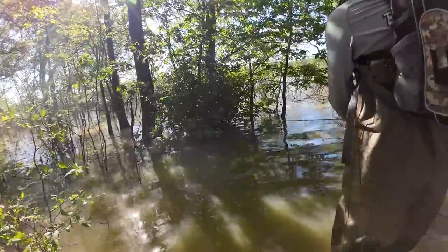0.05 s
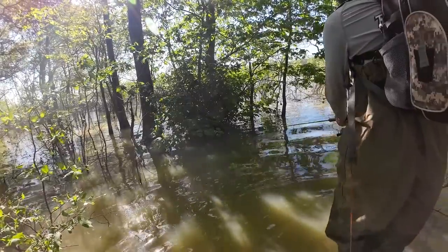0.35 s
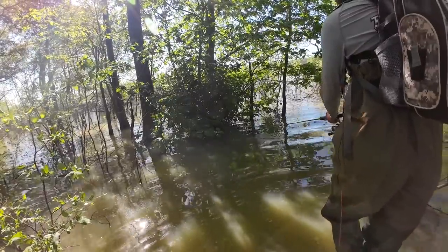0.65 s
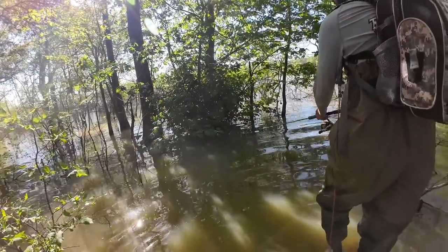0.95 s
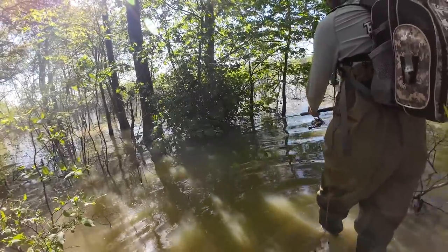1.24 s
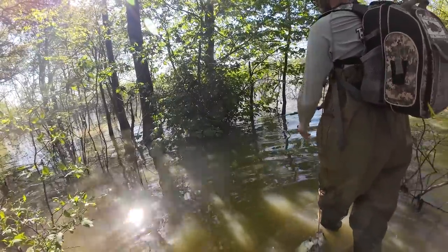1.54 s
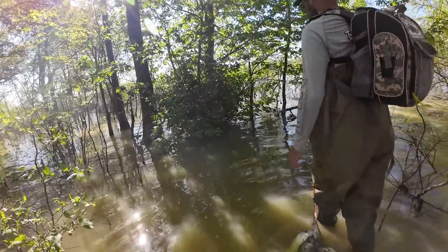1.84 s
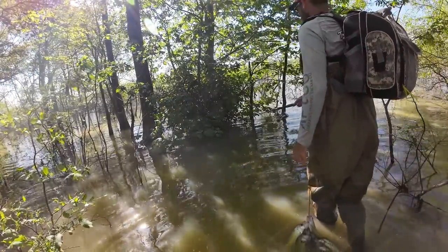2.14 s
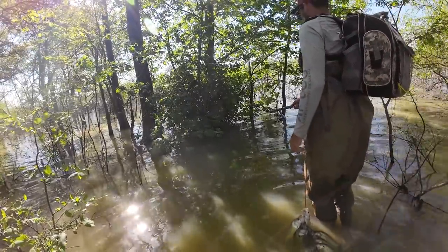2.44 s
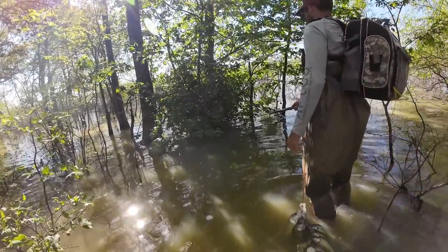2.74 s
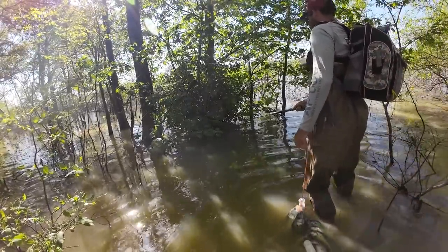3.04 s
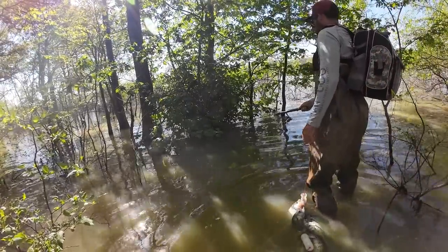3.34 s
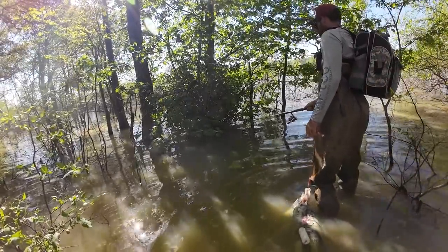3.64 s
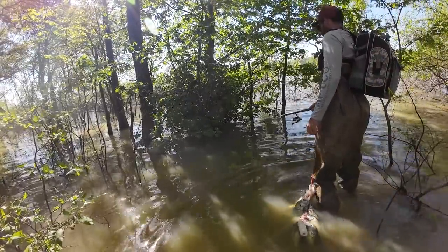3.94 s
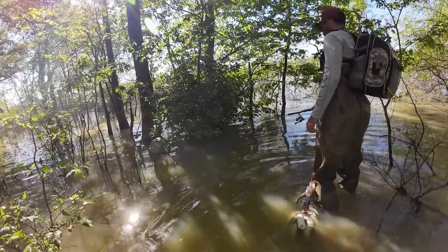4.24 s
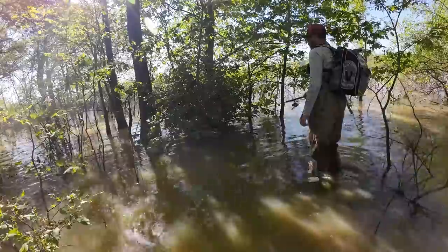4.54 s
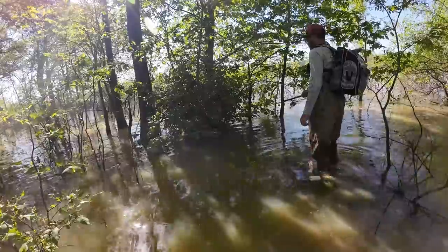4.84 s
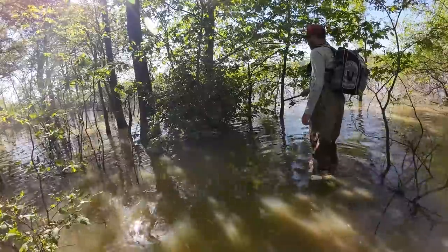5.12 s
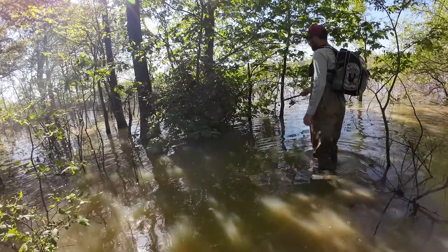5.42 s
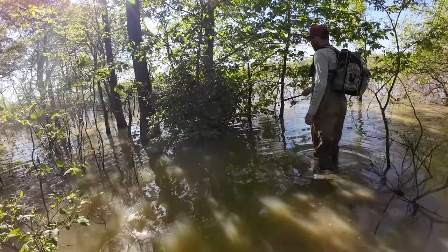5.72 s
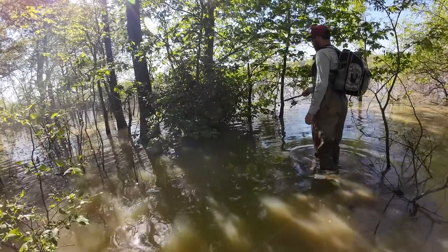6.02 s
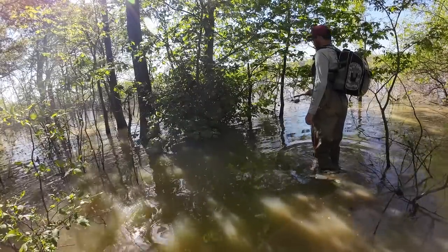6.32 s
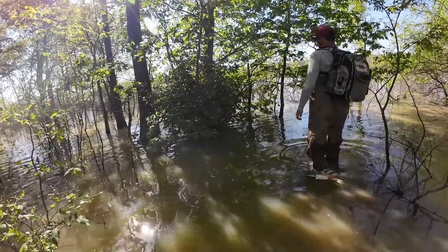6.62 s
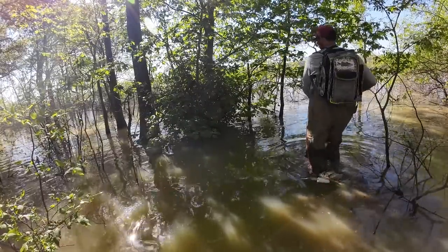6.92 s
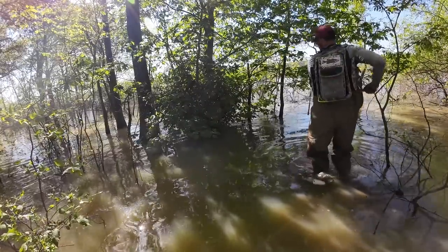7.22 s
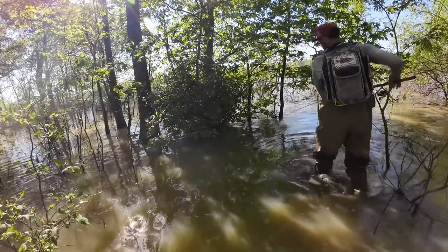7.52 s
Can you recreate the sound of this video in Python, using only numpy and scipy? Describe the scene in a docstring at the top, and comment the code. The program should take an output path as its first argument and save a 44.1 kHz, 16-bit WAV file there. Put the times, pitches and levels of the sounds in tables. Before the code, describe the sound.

Water sloshes, gurgles and drips around a person's legs wading slowly, with wet cloth swishing over a low rumble of wind.

```python
"""A flooded wood, where a man in waders steps slowly through knee-deep water a few metres away.
The trees hiss faintly, a few far birds call, and a far motor and a deep hum drone under gusts of air.
His wet cloth rubs and swishes with each stride. The water he pushes aside gurgles as trapped
bubbles ring, then slaps and drips as it falls back."""
import sys
import numpy as np
from scipy import signal
from scipy.fft import rfft, irfft, next_fast_len
from scipy.io import wavfile
from scipy.ndimage import uniform_filter1d, map_coordinates

SR = 44100
rng = np.random.default_rng(int(sys.argv[2]) if len(sys.argv) > 2 else 0)


def to_wav(sig):
    """Store sig (one row per channel, or 1-D mono) as 16-bit WAV at the path in sys.argv[1].

    Samples outside -1..1 are clipped; the rate is SR.
    """
    pcm = np.clip(np.atleast_2d(sig), -1, 1) * 32767
    pcm = np.round(pcm).astype(np.int16)
    wavfile.write(sys.argv[1], SR, pcm.T)  # frames by channels


N = 338114
TIME = np.arange(N) / SR


def amp(db):
    """Turns decibels into a number to multiply by."""
    return 10 ** (np.asarray(db) / 20)


def unit(x):
    """Scales a signal to an average strength (rms) of 1."""
    return x / np.sqrt(np.mean(x ** 2) + 1e-20)


def read(points, hz):
    """Looks up a pitch in a table, blending between rows on a musical (log) scale."""
    pitches, values = np.transpose(points)
    return np.interp(np.log(hz + 1), np.log(pitches + 1), values)


def colour(x, points):
    """Turns pitches up or down by a table of (pitch [Hz], gain [dB])."""
    size = next_fast_len(N + 4096)
    gain = amp(read(points, np.fft.rfftfreq(size, 1 / SR)))
    return irfft(rfft(x, size) * gain, size)[..., :N]


def wander(per_s):
    """A random drift of strength 1 that picks a new target per_s times a second."""
    targets = rng.standard_normal(8192)
    return unit(np.interp(TIME * per_s, np.arange(len(targets)), targets))


def add(mix, start, sound):
    """Mixes a sound in at a start time in seconds."""
    part = mix[max(round(start * SR), 0):][:len(sound)]
    part += sound[:len(part)]


def patches(x, depth_db, size=256):
    """Lets loudness drift in small patches of time and pitch."""
    spectrum = signal.stft(x, nperseg=size)[2]
    drift = uniform_filter1d(rng.standard_normal(spectrum.shape), size=6, axis=0)
    drift = unit(uniform_filter1d(drift, size=5, axis=1))
    return signal.istft(spectrum * amp(depth_db * drift), nperseg=size)[1][:N]


def surge(start, swell, hold, fade, swell_db=12, fade_db=24.5, onset_share=0.08):
    """One push: it sets in quickly, climbs by swell_db, holds, then drops fade_db per fade time."""
    t = TIME - start
    db = swell_db * np.minimum(t / swell - 1, 0) - fade_db * np.maximum(t - swell - hold, 0) / fade
    return np.clip(t / (onset_share * swell), 0, 1) * amp(db)


# The tone of the woods' hush: (pitch [Hz], relative level [dB])
WOODS_TONE = [(100, 5), (250, 0.5), (340, -1.5), (600, -4), (900, -9), (1300, -16.5), (1900, -24.5),
              (2700, -23.5), (4300, -30), (5300, -24.5), (8000, -34), (11000, -32), (16000, -32)]


def woods(level_db=-53.5, sway_db=0.6):
    """A far, even hush; its treble comes from all sides."""
    around = colour(rng.standard_normal((2, N)), [(300, -18), (1200, -8.5), (3000, -2), (6000, -1.5)])
    ahead = colour(rng.standard_normal(N), [(1200, -0.5), (3000, -4), (6000, -8)])
    breeze_db = np.interp(TIME, [0, 3.8, 5.8, 7.67], [0.83, -1.4, -2.5, 1])
    return amp(level_db + breeze_db + sway_db * wander(9.7)) * unit(colour(around + ahead, WOODS_TONE))


# Far bird calls: (time [s], level [dB], length [s], first pitch [Hz], last pitch [Hz], width [Hz])
BIRD_CALLS = [(4.227, -76.5, 0.17, 6760, 7400, 1910), (5.502, -69.5, 0.21, 795, 640, 70),
              (5.528, -75, 0.21, 1190, 1006, 119.4), (5.588, -75, 0.22, 1300, 1276, 110),
              (5.546, -72, 0.04, 3720, 3570, 600), (5.558, -78, 0.11, 3500, 3720, 400)]


def birds():
    """Trees blur each faint call into a narrow band of noise that swells and dies away."""
    out = np.zeros(N)
    for start, db, length, first, last, width in BIRD_CALLS:
        hz = np.geomspace(first, last, int(length * SR))
        progress = np.linspace(0, 1, len(hz))
        lowpass = signal.butter(4, width / 2, fs=SR, output="sos")
        blur = signal.sosfilt(lowpass, rng.standard_normal((2, 16384)))[:, -len(hz):]
        note = ((blur[0] + 1j * blur[1]) * np.exp(2j * np.pi * np.cumsum(hz) / SR)).real
        add(out, start, amp(db) * unit(note * progress * (1 - progress) ** 2))
    return out


def hum(hz=64.4, level_db=-47.5, waver_db=3.5, blur_turns=0.22):
    """A deep hum that keeps its pitch and wavers a little with the air."""
    gain = amp(level_db + waver_db * np.tanh(wander(9.3)))
    turns = hz * TIME + rng.random() + blur_turns * wander(14)
    return np.sqrt(2) * gain * np.sin(2 * np.pi * turns)


# How fast the motor's shaft spins: (time [s], speed [turns per s])
SHAFT_SPEED = [(0.15, 33.45), (1.45, 32.74), (1.88, 33.65), (2.62, 32.84), (4.5, 32.55), (5.47, 34.3),
               (6.05, 34.96), (6.95, 33.82), (7.67, 33.35)]
# The motor's notes: (pitch [times the shaft speed], first level [dB], last level [dB])
MOTOR_NOTES = [(3, -52.5, -52), (4, -58, -51), (4.5, -59, -60.5), (5, -61, -52.5), (6, -55, -50.5),
               (7, -75.5, -65), (9, -58.5, -79)]


def motor(waver_db=2, jitter_hz=0.1676, blur_turns=0.06, throb_hz=4.2, exhaust_db=-48):
    """One spinning shaft makes several notes, each wavering on its long way through the trees."""
    shaft_turns = np.cumsum(np.interp(TIME, *np.transpose(SHAFT_SPEED)) + jitter_hz * wander(8)) / SR
    throb = np.abs(1 + 0.69 * np.exp(2j * np.pi * throb_hz * (TIME - 6.28)))
    exhaust = amp(exhaust_db) * throb * surge(start=4.82, swell=0.74, hold=1, fade=2.8)
    out = np.zeros(N)
    for multiple, first_db, last_db in MOTOR_NOTES:
        gain = amp(np.linspace(first_db, last_db, N))
        if multiple == 4:  # the exhaust note swells and throbs as the motor speeds up
            gain = np.hypot(gain, exhaust)
        gain = gain * amp(waver_db * wander(12))
        turns = multiple * shaft_turns + rng.random() + blur_turns * wander(22)
        out += np.sqrt(2) * gain * np.sin(2 * np.pi * turns)
    return out


# The tone of the air's rumble: (pitch [Hz], relative level [dB])
RUMBLE_TONE = [(10, 1.5), (30, 10.5), (55, 5), (80, 6.5), (110, -8), (180, -11.5), (260, -14), (400, -66),
               (1500, -87)]
# Gusts of air: (time [s], swell [s], hold [s], fade [s], rumble level [dB], buffeting level [dB])
AIR_GUSTS = [(-.3, 0.18, 0.13, 2.1, -36.5, -65), (0.363, 0.047, 0.086, 0.49, -39, -51),
             (0.666, 0.039, 0.17, 1.26, -58, -36), (1.396, 0.075, 0.29, 2.4, -49.5, -41.5),
             (2.424, 0.038, 0.091, 0.72, -49.5, -36.5), (2.743, 0.097, 1, 1.3, -48.5, -39),
             (3.318, 0.026, 0.02, 0.12, -39, -41), (3.754, 0.049, 0.042, 0.64, -44, -46),
             (7.1, .28, .2, .6, -61, -61)]


def wind(calm_rumble_db=-48.5, calm_buffet_db=-52, lump_db=5.5, lumps_per_s=11):
    """Moving air rumbles; its deepest part buffets the left and right sides separately, in lumps."""
    buffet_tone = [(10, -1.5), (30, 0), (65, -6), (110, -19.5), (250, -41), (600, -61), (2500, -94)]
    rumble = unit(colour(rng.standard_normal(N), RUMBLE_TONE))
    buffet = unit(colour(rng.standard_normal((2, N)), buffet_tone))
    blowing = np.linalg.norm([amp(db) * surge(*shape) for *shape, db, _ in AIR_GUSTS], axis=0)
    shaking = np.linalg.norm([amp(db) * surge(*shape) for *shape, _, db in AIR_GUSTS], axis=0)
    lumps = amp(lump_db * np.tanh(wander(lumps_per_s)))
    shaking = shaking * lumps * amp([[1.5], [-1.5]])  # stronger on the left
    rumble_gain = np.hypot(amp(calm_rumble_db), blowing)
    buffet_gain = np.hypot(amp(calm_buffet_db), shaking)
    return rumble_gain * rumble + buffet_gain * buffet


# The tone of rubbing wet cloth: (pitch [Hz], relative level [dB])
CLOTH_TONE = [(150, 3.5), (300, 7), (600, 2.5), (950, -5.5), (1400, 2), (2000, -4), (3200, 2), (4300, 0.5),
              (5500, 1), (7000, -1.5), (9000, -7.5), (10500, -4), (16000, -19)]
# Each push of a leg: (time [s], swell [s], hold [s], fade [s], cloth level [dB], water level [dB])
LEG_PUSHES = [(-.3, 0.14, 0.13, 0.34, -58, -64.5), (0.07, 0.03, 0.31, 0.76, -57.5, -58.5),
              (0.203, 0.27, 0.088, 0.59, -53.5, -54.5), (0.836, 0.042, 0.45, 0.16, -72, -63.5),
              (1.358, 0.029, 0.031, 0.15, -59.5, -58.5), (1.513, 0.026, 0.45, 0.22, -66.5, -72),
              (1.987, 0.049, 0.039, 0.4, -51, -53), (2.1, 0.047, 0.24, 0.2, -46, -54.5),
              (2.572, 0.053, 0.66, 0.28, -64.5, -58.5), (4.402, 0.0022, 0.04, 0.49, -52, -58.5),
              (4.853, 0.031, 0.046, 0.59, -69.5, -63.5), (6.31, 0.073, 0.025, 0.72, -54, -85),
              (6.496, 0.039, 0.47, 0.25, -63, -53.5), (7.081, 0.32, 0.025, 0.34, -46.5, -42),
              (7.52, 0.034, 0.07, 0.11, -44, -41)]


def swish(snaps_per_s=3000, spread_db=3, flutter_db=0.5, echo_gain=0.2, echo_ms=(1.188, 0.52)):
    """Wet cloth rubs and sheds spray: a hiss full of tiny snaps, plus its echo off the water."""
    snaps = (rng.random(N) < snaps_per_s / SR) * rng.choice([-1, 1], N)
    snaps = snaps * amp(spread_db * np.minimum(rng.exponential(1, N), 5))
    rub = patches(unit(snaps) + 1.46 * rng.standard_normal(N), depth_db=2.5)
    effort, delay_ms = np.zeros(N), np.zeros(N)
    for start, swell, hold, fade, db, _ in LEG_PUSHES:
        effort = np.hypot(effort, amp(db) * surge(start, swell, hold, fade))
        # the echo comes sooner as the leg swings down, so the tone sweeps upward
        sweep_ms = np.interp(TIME, [start, start + swell + hold + fade], echo_ms)
        delay_ms = np.where(TIME < start, delay_ms, sweep_ms)
    echo = map_coordinates(rub, [np.arange(N) - delay_ms * SR / 1000], order=3)
    return unit(colour(rub + echo_gain * echo, CLOTH_TONE)) * effort * amp(flutter_db * wander(70))


def stirring(lag_s=0.006, settle_s=0.092):
    """How hard the water moves: it follows each push of a leg a little late and calms more slowly."""
    pushes = [amp(db) * surge(start + lag_s, swell, hold, fade + settle_s)
              for start, swell, hold, fade, _, db in LEG_PUSHES]
    return np.linalg.norm(pushes, axis=0)


def bubble(hz, ring_s, glide, attack_s):
    """A pocket of air rings and drops 60 dB in ring_s, while its pitch slides by the share glide."""
    t = np.arange(int(1.2 * ring_s * SR) + 8) / SR
    note = np.sin(2 * np.pi * hz * (t + glide * t ** 2 / ring_s / 2))
    return note * np.exp(-np.log(1000) * t / ring_s) * (1 - np.exp(-t / attack_s))


# How loud bubbles are, from big and low to small and high: (pitch [Hz], relative level [dB])
BUBBLE_LEVELS = [(350, -28), (600, -1), (1250, 10), (2000, -4.5), (3300, -1), (5500, 3), (11000, 2)]


def swarm(pitches, per_s, spread_db, cycles):
    """Bubbles born at random, most of them weak; the small, high ones tend to die first."""
    out = np.zeros(N)
    for hz in pitches:
        births = rng.random(N) < per_s / len(pitches) / SR
        strengths = amp(spread_db * np.minimum(rng.exponential(1, N), 3.5))
        ring_s = cycles / np.sqrt(hz * 900) * rng.uniform(0.61, 1.9)
        ring = bubble(hz, ring_s, glide=rng.uniform(-0.59, 0.64), attack_s=2 / hz)
        out += amp(read(BUBBLE_LEVELS, hz)) * signal.oaconvolve(births * strengths, ring)[:N]
    return unit(out)


def drips(ring_db=-65, tick_db=-67, patter_db=-66, stirred_db=-59):
    """Drops fall back into stirred water: larger ones ring, tiny ones tick and clumps patter."""
    stir = stirring()
    rings = swarm(np.geomspace(600, 4000, 24), per_s=70, spread_db=2, cycles=13.6)
    ticks = swarm(np.geomspace(2800, 8500, 24), per_s=260, spread_db=3, cycles=8)
    patter = swarm(np.geomspace(1400, 4200, 20), per_s=700, spread_db=2.5, cycles=9)
    clumps = unit(patches(patter, depth_db=4, size=512))
    dripping = stir / np.hypot(stir, amp(stirred_db))
    return dripping * (amp(ring_db) * rings + amp(tick_db) * ticks + amp(patter_db) * clumps)


def slosh(bubbles_db=-8.5, churn_db=-4, crackle_db=-14, lap_db=3, throw_db=-64, merge_db=-49):
    """Stirred water: bubbles merge into a churn under a hard push, and droplets crackle on top."""
    churn_tone = [(120, -7), (350, 1.5), (600, 3.5), (1000, -0.5), (1400, -1.5), (2000, -3),
                  (3000, -4), (6000, -34), (12000, -42)]
    stir = stirring() * amp(lap_db * wander(14))
    bubbles = swarm(np.geomspace(420, 4500, 40), per_s=420, spread_db=3, cycles=26.7)
    crackle = swarm(np.geomspace(4200, 12000, 24), per_s=500, spread_db=6, cycles=8)
    churn = unit(colour(patches(rng.standard_normal(N), depth_db=3), churn_tone))
    thrown = stir ** 2 / (stir ** 2 + amp(throw_db) ** 2)  # calm water throws no droplets
    merged = stir ** 2 / (stir ** 2 + amp(merge_db) ** 2)
    bubble_gain = amp(bubbles_db) * np.sqrt(1 - merged)
    churn_gain = np.hypot(amp(churn_db), amp(bubbles_db) * np.sqrt(merged))
    return stir * (bubble_gain * bubbles + churn_gain * churn + amp(crackle_db) * thrown * crackle)


# Air pockets closing: (time [s], level [dB], length [s], first pitch [Hz], last pitch [Hz])
AIR_POCKETS = [(0.801, -56, 0.025, 683, 1400), (0.904, -50, 0.02, 740, 875), (1.323, -54, 0.019, 625, 730),
               (1.325, -51.5, 0.011, 1390, 1300), (1.456, -58.5, .026, 1550, 1730),
               (3.22, -53, .043, 700, 3210), (3.233, -45, 0.036, 370, 630), (6.527, -50, 0.035, 605, 640),
               (7.061, -53, 0.036, 650, 1380)]


def gulps(roughness=0.35, jitter=0.015):
    """A hollow behind the leg fills, so its ragged note glides, mostly upward."""
    out = np.zeros(N)
    for start, db, length, first, last in AIR_POCKETS:
        count = int(length * SR)
        hz = np.geomspace(first, last, count) * (1 + jitter * wander(493)[:count])
        ragged = 1 + roughness * wander(482)[:count]
        note = np.sin(2 * np.pi * np.cumsum(hz) / SR)
        add(out, start, amp(db) * ragged * note * signal.windows.tukey(count, 0.5))
    return out


def boot_thump(start=0.632, db=-28, hz=115):
    """A boot sets down in the mud with a dull knock."""
    out = np.zeros(N)
    add(out, start, amp(db) * bubble(hz, ring_s=0.11, glide=1, attack_s=0.0026))
    return out


# The loudest drops and bubbles: (time [s], relative level [dB], pitch [Hz], glide [share of pitch])
BIG_DROPS = [(.034, -35.5, 684, -0.1), (.116, -37.5, 506, -0.047), (.545, -36, 7600, -0.23),
             (.586, -30.5, 8900, 0.1), (.588, -29, 3000, -0.37), (.611, -29.5, 2260, -0.3),
             (.904, -43.5, 2540, -.4), (1.019, -39, 3360, -0.03), (1.111, -37.5, 3000, -0.31),
             (1.185, -47, 2500, 0.34), (1.232, -43.5, 10500, 0), (1.308, -46, 705, -0.054),
             (1.371, -46.5, 1290, 0), (1.418, -39, 1220, -0.014), (1.446, -44.5, 3600, -.2),
             (1.526, -47, 1190, 0.2), (1.595, -40, 700, .2), (1.686, -33.5, 506, -0.11),
             (2.271, -36.5, 1050, -0.11), (2.311, -41.5, 690, -0.1), (2.404, -36, 1620, -.3),
             (2.5915, -32.5, 3290, -0.18), (2.608, -46, 5250, -0.06), (2.676, -46, 5650, -0.055),
             (2.788, -43, 1780, -0.23), (2.868, -44.5, 2540, -0.33), (2.904, -48, 10250, -0.13),
             (2.924, -43, 2900, -.3), (2.938, -37, 2000, 0.24), (2.993, -43.5, 3170, 0),
             (3.009, -40, 3010, 0.051), (3.026, -41, 1850, 0.23), (3.084, -39, 630, 0.22),
             (3.101, -41, 1070, -0.33), (3.105, -38, 3520, .1), (3.212, -46, 2050, -.2),
             (3.335, -42, 5260, -0.25), (3.335, -41.5, 1840, 0.15), (3.363, -39, 3740, -0.23),
             (3.402, -41.5, 630, -0.21), (4.443, -43, 2320, 0.076), (4.738, -48, 1050, .3),
             (4.756, -44, 3400, 0), (4.828, -55, 2550, -0.33), (4.897, -41, 5000, 0),
             (4.953, -49, 1140, -0.57), (4.975, -42, 5630, 0), (5.047, -46, 634, 0.17),
             (5.564, -52, 3020, -0.056), (6.336, -34, 3700, 0.18), (6.672, -35, 1250, -0.48),
             (6.68, -45, 820, 0.34), (6.694, -44, 590, 0.37), (6.713, -34, 1330, 0.15),
             (6.752, -44, 687, 0.52), (6.811, -44, 1120, 0.11), (6.850, -46, 1120, -0.35),
             (6.949, -33.5, 1591, 0.098), (6.993, -51, 3100, -.2), (7.016, -29.5, 3160, 0.13),
             (7.019, -44, 3130, -0.12), (7.040, -38, 546, -0.31), (7.063, -34.5, 700, 0.044),
             (7.104, -35.5, 1570, 0.21), (7.155, -42, 745, 0.11), (7.221, -36.5, 4750, 0.049),
             (7.246, -36.5, 3370, 0), (7.445, -24.5, 4320, 0.46), (7.4465, -27, 5530, 0.027),
             (7.534, -30.5, 1480, 0.042), (7.556, -27, 1330, 0), (7.576, -25.5, 1730, 0.1),
             (7.593, -29, 1360, -0.17), (7.6085, -22, 1021, 0.44)]


def plops(ring_db=2.5, splash_gain=0.23, splash_s=0.0043, knock_cycles=3.3, tail_gain=0.36):
    """Each drop knocks, then leaves a weak, gliding ring inside a brief splash."""
    out, t = np.zeros(N), np.arange(1024) / SR
    for start, db, hz, glide in BIG_DROPS:
        band = signal.butter(2, [hz * 0.75, min(hz * 1.35, 18000)], "band", fs=SR, output="sos")
        splash = unit(signal.sosfilt(band, rng.standard_normal(len(t)))) * np.exp(-t / splash_s)
        ring_s = 0.025 * (hz / 1000) ** -0.36  # smaller, higher bubbles ring more briefly
        ring = bubble(hz, ring_s, glide, attack_s=1.3 / hz)
        knock = np.exp(-np.arange(len(ring)) / SR * hz / knock_cycles)
        add(out, start, amp(db + ring_db) * ring * (tail_gain + knock))
        add(out, start, amp(db) * splash_gain * splash)
    return out


# The loudest water slaps and cloth scuffs: (time [s], level [dB], fade [s], middle pitch [Hz])
SLAPS_AND_SCUFFS = [(0.034, -42.5, 0.0021, 890), (0.575, -43, 0.0015, 2900), (0.634, -41.5, 0.011, 2980),
                    (0.875, -41, 0.00033, 2460), (1.284, -44.5, 0.00085, 2650), (1.595, -50, 0.0024, 910),
                    (1.686, -43.5, 0.0024, 930), (1.865, -41, 0.0042, 6200), (1.946, -46.5, 0.017, 4230),
                    (2.658, -41, 0.0017, 4460), (2.72, -45, 0.0041, 8000), (2.743, -48.5, 0.012, 2000),
                    (2.901, -42, .004, 1300), (4.485, -41, .003, 4800), (4.646, -43.5, 0.0037, 3430),
                    (4.685, -47.5, 0.0048, 2750), (4.7596, -41.5, 0.0075, 3050), (4.758, -42.5, 0.01, 835),
                    (4.775, -52, 0.0042, 990), (4.891, -50, 0.0071, 4950), (4.931, -54, 0.018, 2880),
                    (4.975, -47, 0.009, 6000), (5.039, -54, 0.0083, 3200), (5.066, -50.5, 0.0056, 3900),
                    (5.165, -63, 0.0032, 1100), (5.172, -52, 0.0039, 1090), (5.202, -55, 0.0024, 1500),
                    (5.49, -54, 0.0043, 6950), (6.33, -43, 0.024, 2980), (6.384, -40, 0.004, 3360),
                    (6.398, -43.5, .012, 4400), (6.469, -37.5, 0.011, 3900), (6.592, -45, 0.0039, 4500),
                    (6.621, -43, 0.0076, 4560), (6.636, -37, 0.008, 2880), (6.72, -41.5, 0.0033, 3930),
                    (6.779, -42, 0.003, 1500), (6.811, -41, 0.0026, 3700), (6.827, -44, 0.0027, 3800),
                    (6.919, -33, 0.0072, 4850), (6.938, -38.5, 0.012, 3800), (6.962, -39, 0.007, 2160),
                    (7.041, -42, 0.0073, 4500), (7.286, -32.5, 0.0039, 7200), (7.512, -35, 0.0026, 6350),
                    (7.5546, -19.5, 0.0028, 4400), (7.582, -40, 0.0033, 3500), (7.634, -32, 0.004, 5140)]


def slaps(width_octaves=1.63, graininess=0.84, rise_share=0.29, size=8192):
    """Water slaps and cloth scuffs in short, spattering bursts; longer ones start more softly."""
    out, t, hz = np.zeros(N), np.arange(size) / SR, np.fft.rfftfreq(size, 1 / SR)
    for start, db, fade, middle in SLAPS_AND_SCUFFS:
        distance = np.log2((hz + 1) / middle) / width_octaves
        band = 1 / (1 + distance ** 2) ** 2 * hz / (hz + 300)
        spatter = np.abs(1 + graininess * unit(uniform_filter1d(rng.standard_normal(size), size=50)))
        burst = unit(irfft(rfft(rng.standard_normal(size) * spatter) * band))
        shape = np.exp(-t / fade) * (1 - np.exp(-t / (rise_share * fade)))
        add(out, start, amp(db) * burst * shape)
    return out


# Flung water landing flat: (time [s], peak level [dB], middle pitch [Hz])
FLAT_LANDINGS = [(0.6112, -28, 4500), (1.1031, -34, 3030), (1.112, -26.5, 6500), (4.76, -41, 2800),
                 (6.779, -41, 3050), (6.8309, -26.5, 3740), (6.92, -40, 5040), (6.945, -30, 4000),
                 (7.549, -23.5, 2200), (7.5582, -20.5, 11200), (7.609, -23.5, 1000)]


def splats(smack_cycles=0.38, spray_gain=0.16, spray_s=0.0012):
    """Water lands with a sharp smack: a single swing of pressure, with a little spray behind it."""
    out, t = np.zeros(N), np.arange(512) / SR
    for start, db, hz in FLAT_LANDINGS:
        swing = np.sin(2 * np.pi * hz * t) * t * np.exp(-t * hz / smack_cycles)
        spray = unit(np.convolve(rng.standard_normal(len(t)), swing)[:len(t)]) * np.exp(-t / spray_s)
        add(out, start, amp(db) * (swing / np.abs(swing).max() + spray_gain * spray))
    return out


def tree_echo(x, echo_db=-15, ring_s=0.1):
    """Trunks and the water surface add a thin, short echo, different on each side."""
    t = np.arange(SR // 2) / SR
    bounces = rng.standard_normal((2, len(t))) * (rng.random((2, len(t))) < 0.04)
    bounces *= (t > 0.004) * amp(-60 * t / ring_s)
    bounces /= np.linalg.norm(bounces, axis=1, keepdims=True)
    return x + amp(echo_db) * signal.oaconvolve(x, bounces, axes=1)[:, :N]


# How much sound nearby surfaces scatter: (pitch [Hz], relative level [dB])
SCATTER_TONE = [(300, -44), (1400, -37), (3000, -11), (6500, -4), (15000, 8.5)]


def from_right(x, lag_ms, scatter_s=0.0008, size=1024):
    """Sound from the right reaches the left side later; each side gets its own scattered treble."""
    padded = next_fast_len(N + 4096)
    hz = np.fft.rfftfreq(padded, 1 / SR)
    bounces = rng.standard_normal((2, size)) * np.exp(-np.arange(size) / SR / scatter_s)
    paths = rfft(bounces / np.linalg.norm(bounces, axis=1, keepdims=True), padded)
    # evened out, so the two sides differ more in timing than in loudness
    scatter = amp(read(SCATTER_TONE, hz)) * paths / np.hypot(np.abs(paths), 0.5)
    half_lag = np.exp(-1j * np.pi * hz * lag_ms / 1000)
    direct = np.array([half_lag, 1 / half_lag])
    return irfft(rfft(x, padded) * (direct + scatter), padded)[:, :N]


def scene(lean_db=0.4):
    """The man close by, over the background; cloth, water and splashes each have their own angle."""
    cloth = from_right(swish(), lag_ms=0.022)
    water = from_right(slosh() + drips() + gulps() + boot_thump(), lag_ms=0.015)
    splashes = from_right(plops() + slaps() + splats(), lag_ms=0.025)
    wading = tree_echo(cloth + water + splashes)
    background = motor() + hum() + woods() + birds()
    balance = amp([[lean_db], [-lean_db]])  # the left side is a little louder
    return (wading + background) * balance + wind()


# How the microphone treats the highest treble: (pitch [Hz], gain [dB])
MIC_TONE = [(10800, 1), (11700, -5.5), (12400, -17), (13800, -16), (15200, -1.5), (16000, -22)]


def record(dry, top_hz=16000):
    """The microphone dulls the highest treble and cuts off everything above top_hz."""
    lowpass = signal.firwin(511, top_hz, window=("kaiser", 9), fs=SR)
    return signal.oaconvolve(colour(dry, MIC_TONE), lowpass[None], "same")


dry = scene()
out = record(dry)
to_wav(out)
```